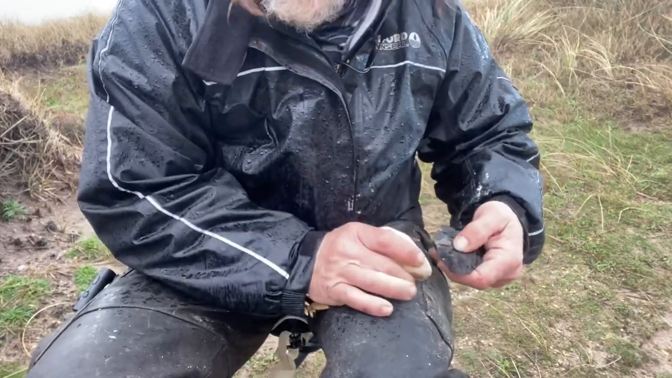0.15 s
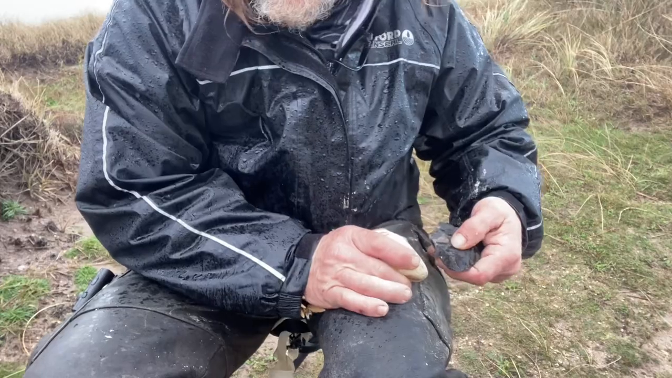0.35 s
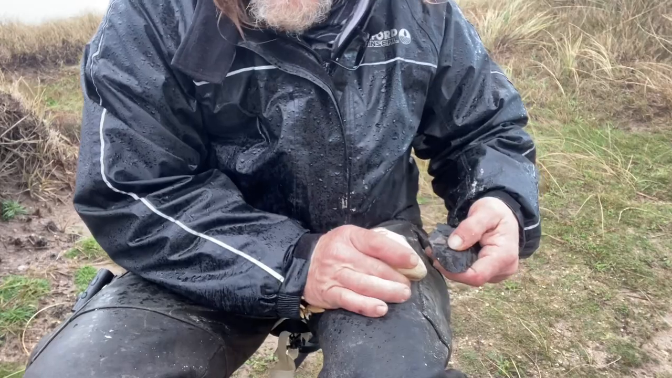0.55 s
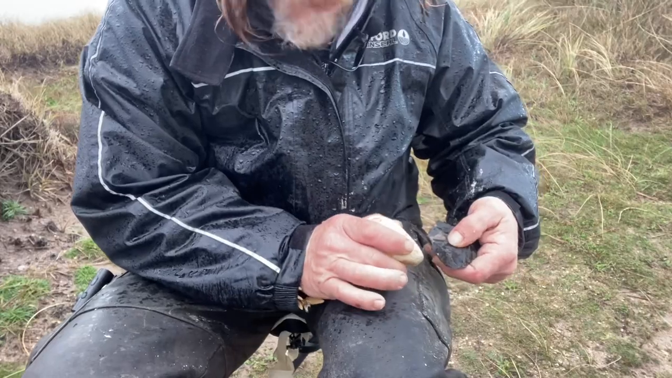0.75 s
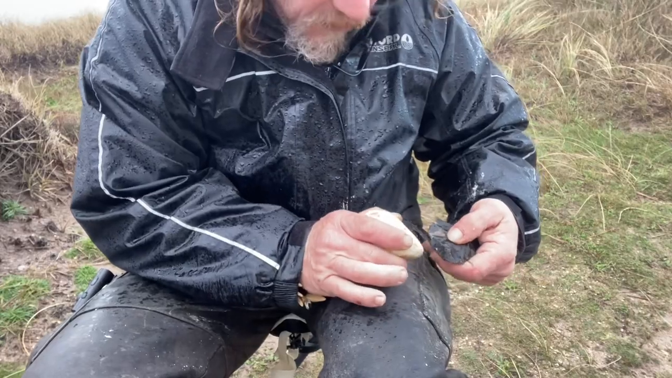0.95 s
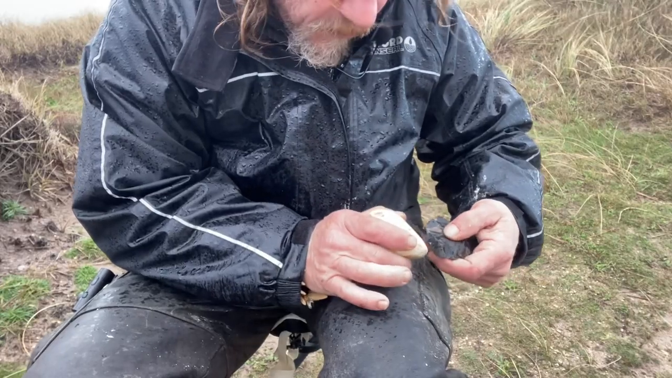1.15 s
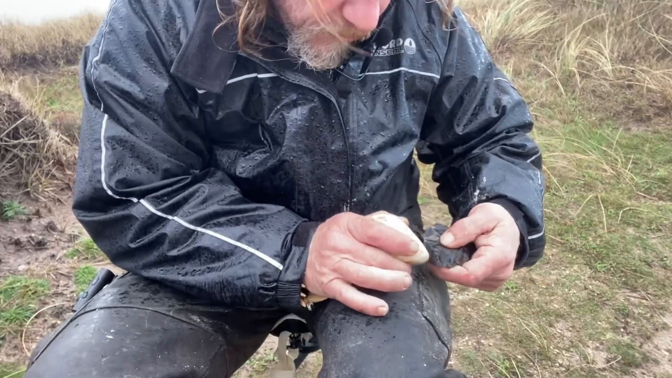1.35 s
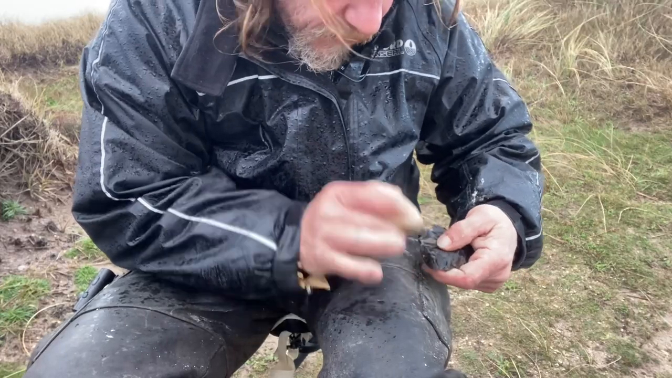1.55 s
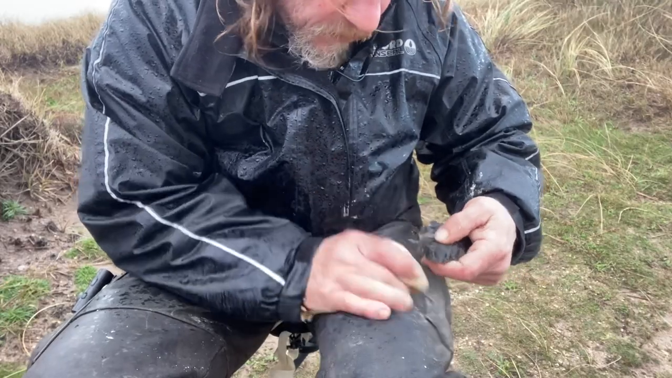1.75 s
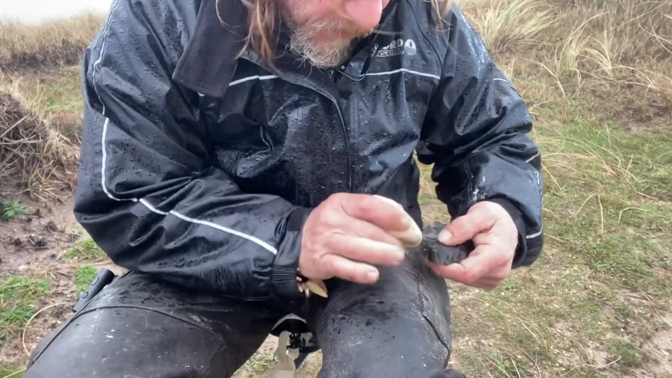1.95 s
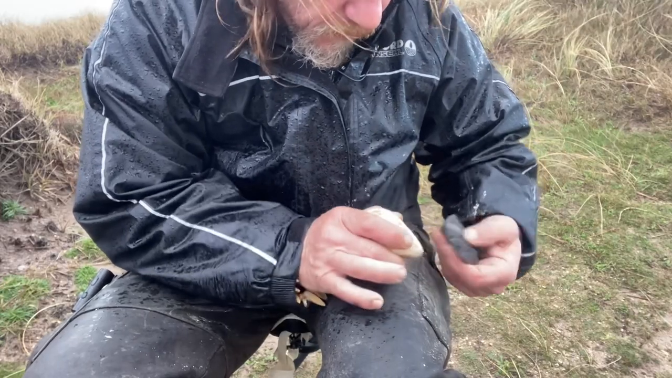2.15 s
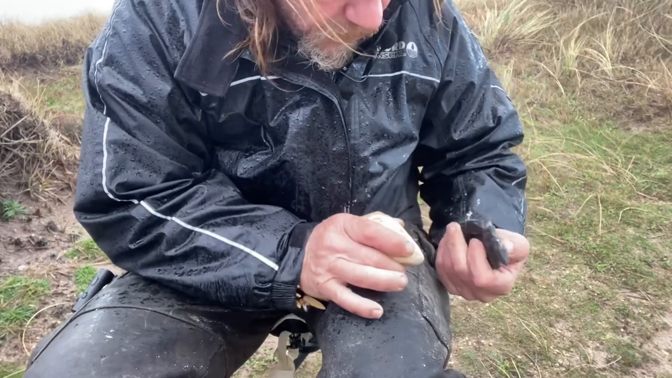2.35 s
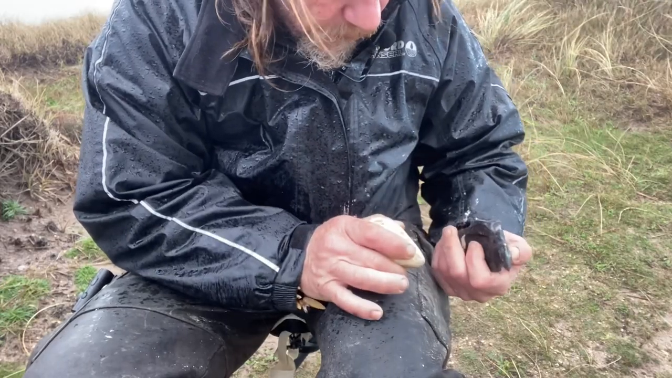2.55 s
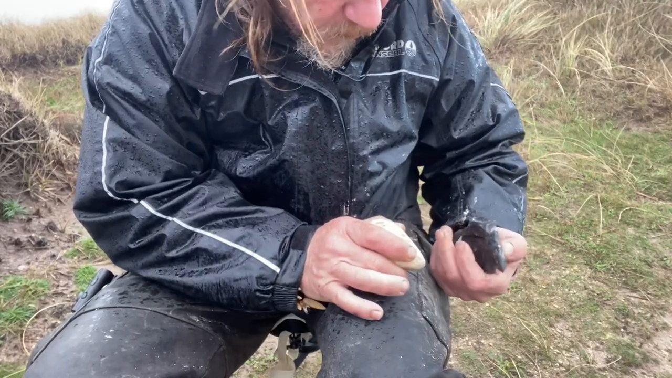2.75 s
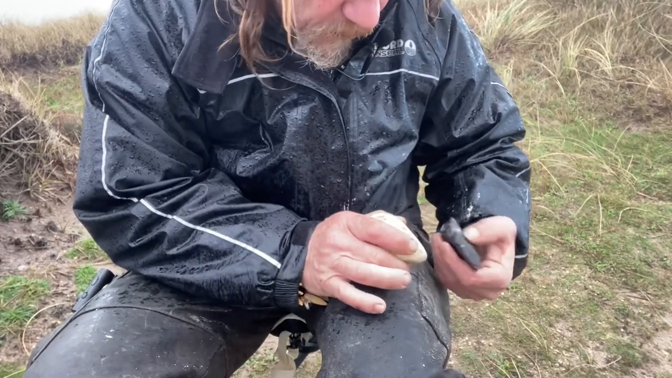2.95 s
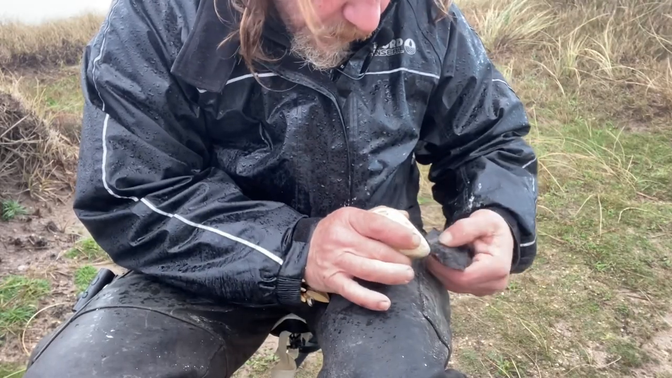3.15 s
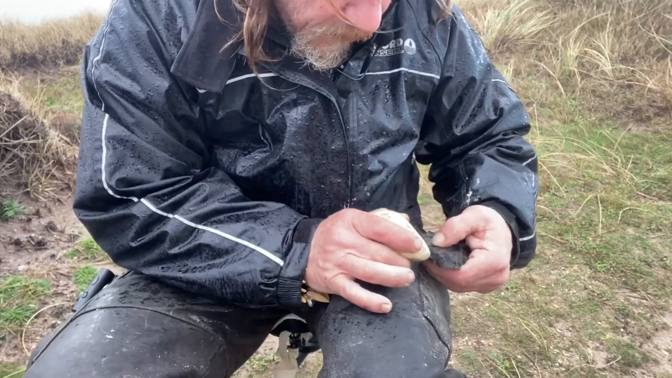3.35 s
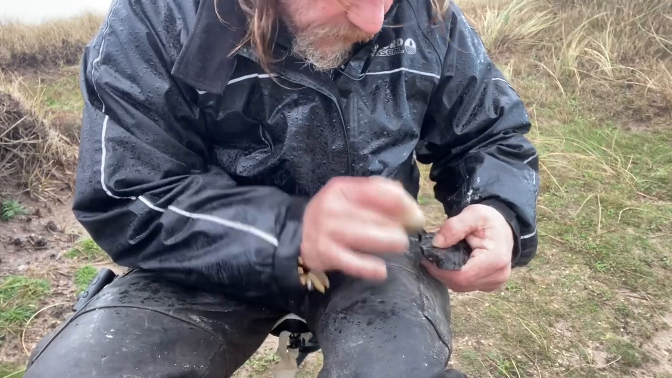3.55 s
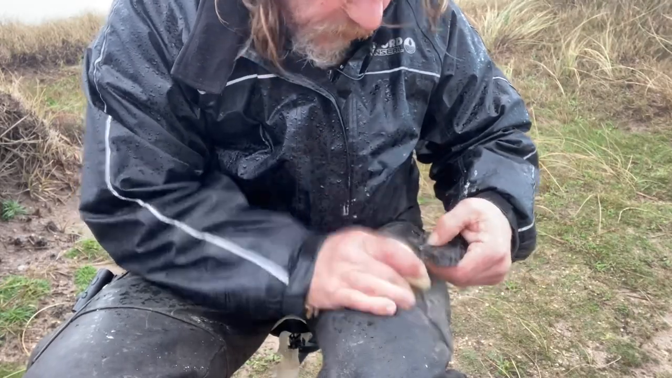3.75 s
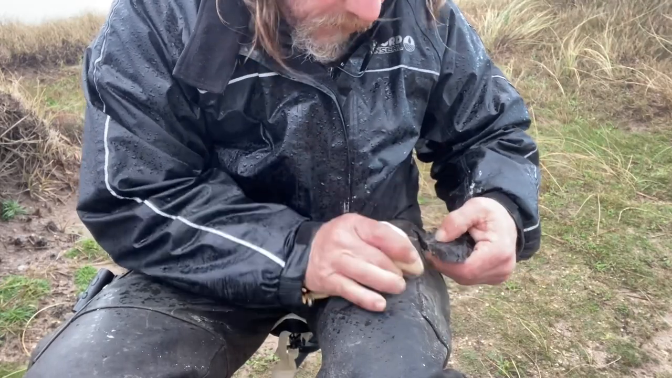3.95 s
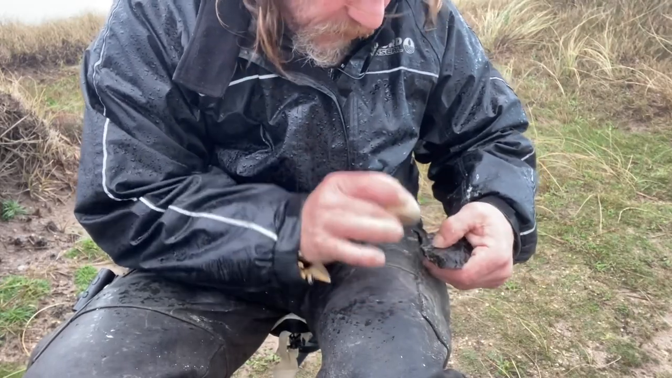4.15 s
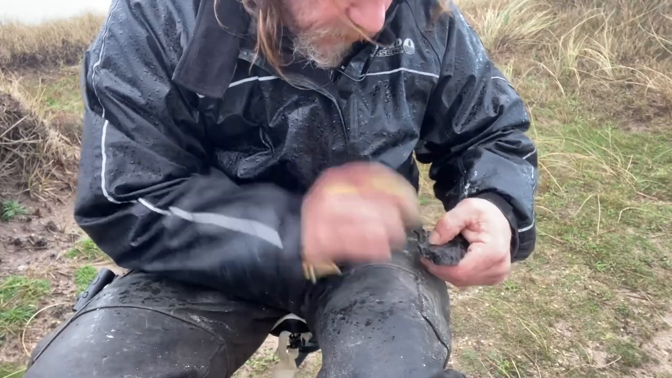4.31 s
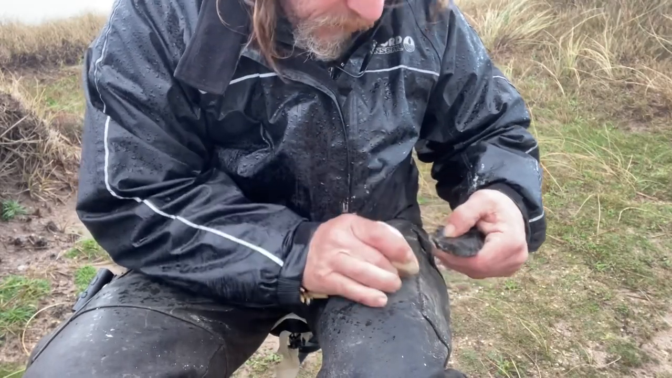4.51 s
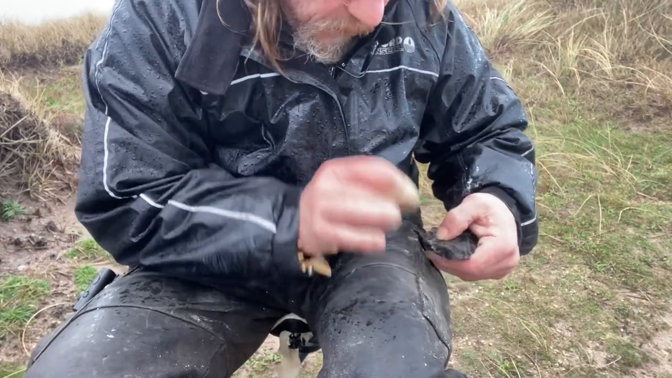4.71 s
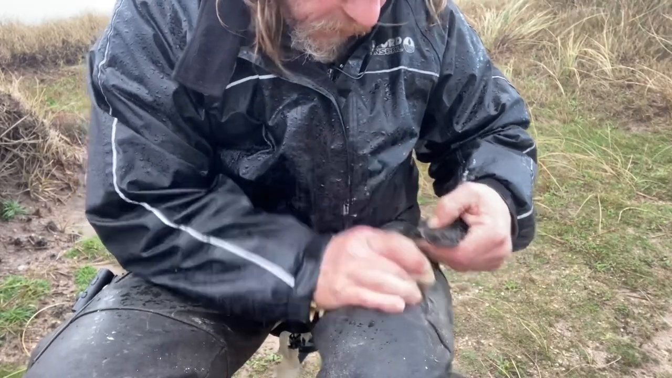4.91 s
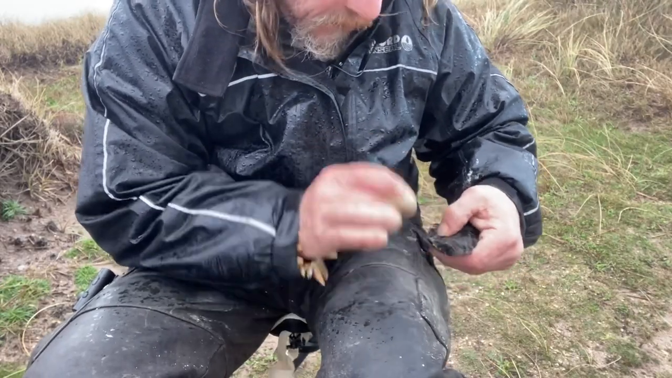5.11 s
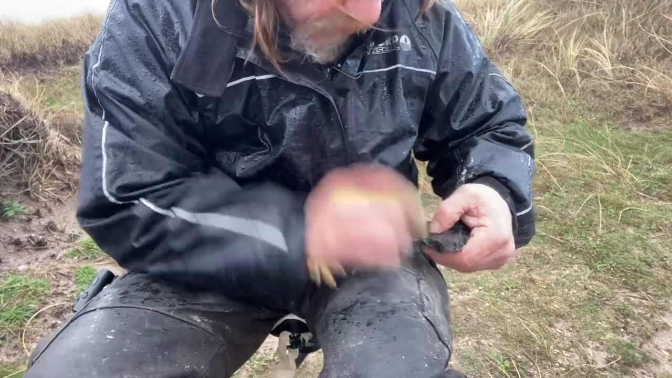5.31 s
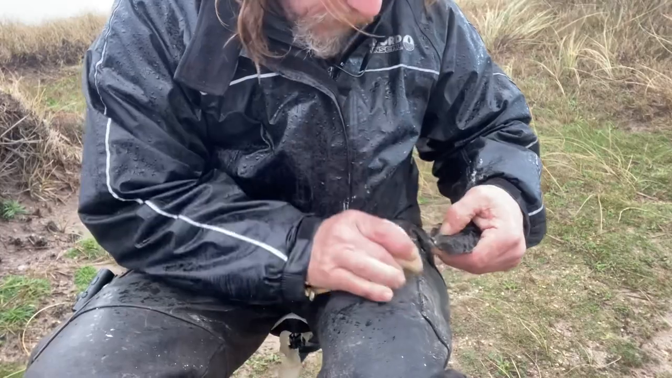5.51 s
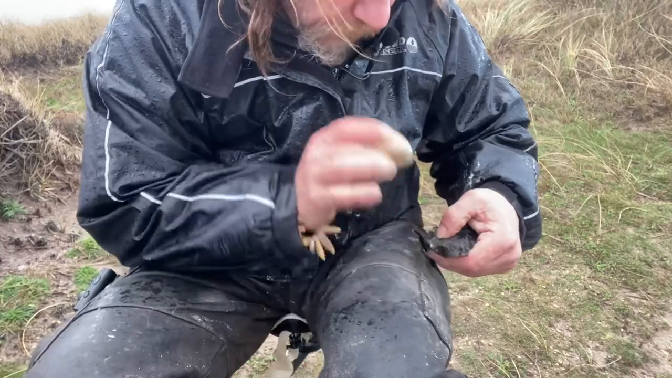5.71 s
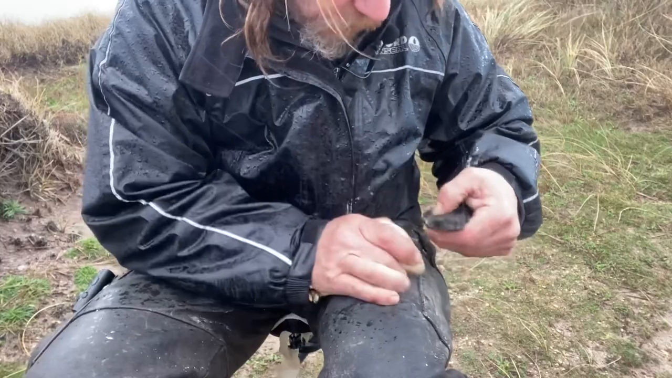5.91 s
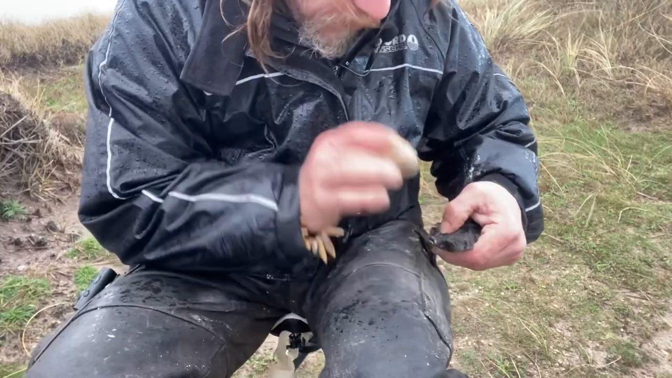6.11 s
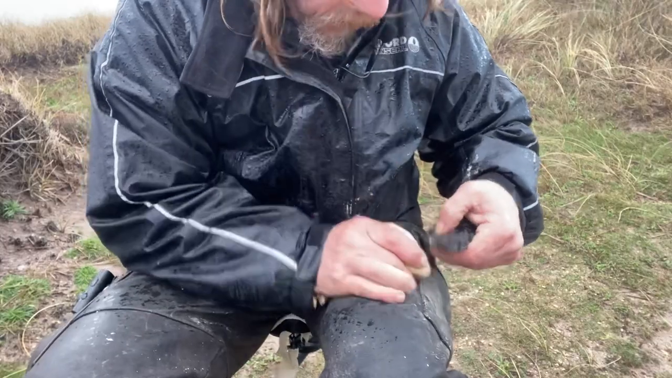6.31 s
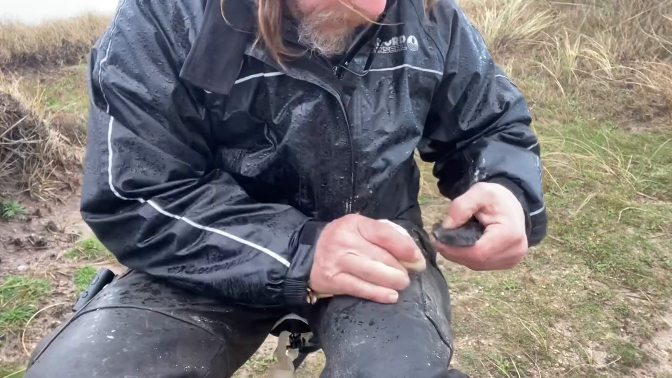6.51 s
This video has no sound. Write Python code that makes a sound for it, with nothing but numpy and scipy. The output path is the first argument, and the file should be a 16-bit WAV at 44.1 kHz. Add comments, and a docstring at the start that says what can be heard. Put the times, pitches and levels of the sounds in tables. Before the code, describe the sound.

Open outdoor air, dry and without echo, heard by a phone about a metre away. A faint grassy hiss lies under low wind rumble, with a strong brief buffet near 1.4 s. A nylon sleeve rustles from 1.45 s, swishes quickly, and a hammerstone touches flint at 1.73 s: a thin, bright, glassy tick with a tiny scrape. Faint jacket stirring and dry ticks follow. From 3.3 s gusts flutter and thump the microphone. A hard, sharp clack lands at 3.75 s, then more at 4.35, 4.9, 5.34, 5.84 and 6.27 s, each preceded by a rising sleeve swish. Every blow is a choked double contact with brief flint ring, splintering crack and gritty grind; those at 4.9 and 5.84 s are duller and crunchier, the one at 6.27 s rings clearly. Wind slaps cluster between blows, and a heavy low buffet swells at the end, about 6.5 s.

```python
"""On a windy grass bank, a hammerstone knocks flakes off a hand-held flint a metre from a phone.
Each blow clacks as two choked tones, rings the flint's modes and cracks, thuds and grinds in shaped noise.
The nylon sleeve swishes as hiss that follows the arm, with faint dry ticks on the jacket.
Gusts rumble and flutter as flickering noise, eddies thump the microphone ports as falling tones,
and a far wash of grass and air hisses beneath."""
import sys
import numpy as np
from scipy import signal
from scipy.fft import rfft, irfft
from scipy.io import wavfile
from scipy.ndimage import uniform_filter1d

SR = 44100
rng = np.random.default_rng(int(sys.argv[2]) if len(sys.argv) > 2 else 0)


def digitize_waveform(pressure):
    """Quantize a signal to 16-bit integers and store it at the path in sys.argv[1].

    Rows of a 2-D input are taken as channels; values are limited to [-1, 1].
    """
    field = np.atleast_2d(pressure).T
    bounded = np.clip(field, -1, 1)
    quanta = np.round(bounded * 32767).astype(np.int16)
    wavfile.write(sys.argv[1], SR, quanta)


N = 289737

# wind on the ports beneath the buffets: start_s, rumble_db, flutter_db
GUSTS = [(0.0, -38, -57), (0.12, -45, -55), (0.26, -41.5, -45.5), (1.13, -43.5, -45), (1.4, -38.5, -51.5),
         (1.82, -44, -47.5), (2.27, -43, -40), (2.55, -42.5, -42), (3.31, -37.5, -43), (3.61, -28, -39),
         (3.81, -42, -39.5), (4.04, -37, -37.5), (4.36, -37, -45.5), (4.52, -36.5, -43), (4.71, -34, -40),
         (4.94, -41.5, -39), (5.3, -43, -41), (5.61, -40, -36.5), (5.99, -31, -36), (6.29, -33.5, -36.5),
         (6.36, -39, -36.5)]
# short buffets of stronger wind: peak_s, rumble_db, flutter_db, half_length_s
WIND_BUFFETS = [(0.041, -28, -36.5, 0.057), (0.145, -25, -40, 0.014), (0.261, -33.5, -63, 0.056),
                (0.685, -36, -48, 0.051), (1.243, -29.5, -42.5, 0.024), (1.311, -26, -40, 0.015),
                (1.406, -19.5, -42.5, 0.014), (2.3, -34.5, -42, 0.055), (2.944, -38, -55, 0.015),
                (3.112, -33, -41, 0.049), (3.285, -32, -31, 0.0096), (3.318, -29, -46, 0.028),
                (3.478, -27, -40, 0.023), (3.55, -33, -32.5, 0.036), (3.652, -23.5, -33, 0.023),
                (3.744, -27, -32.5, 0.032), (3.896, -34, -49, 0.014), (3.975, -29.5, -30.5, 0.019),
                (4.343, -31.5, -38.5, 0.032), (4.534, -24.5, -32, 0.044), (4.702, -27.5, -34, 0.039),
                (4.774, -30, -43.5, 0.024), (4.87, -29.5, -39.5, 0.035), (5.206, -28.5, -35.5, 0.077),
                (5.342, -23.5, -28, 0.015), (5.876, -27, -29.5, 0.045), (5.983, -27.5, -24.5, 0.016),
                (6.075, -31, -33, 0.022), (6.328, -26, -35, 0.028), (6.422, -20.5, -35, 0.037),
                (6.48, -24, -30, 0.019), (6.519, -20, -23.5, 0.014), (6.565, -12, -26, 0.011)]
# colour of the low wind: pitch_hz, relative level_db per Hz
RUMBLE_COLOUR = [(24, -42), (38, -9), (60, -2), (90, -5), (140, -10.5), (220, -18.5), (400, -29.5)]
# colour of the quicker turbulence: pitch_hz, relative level_db per Hz
FLUTTER_COLOUR = [(90, -43), (160, 2), (260, -2), (450, -10), (700, -12), (1000, -18.5), (1600, -29.5)]
# colour of the far wash: pitch_hz, relative level_db per Hz
AIR_COLOUR = [(200, -8.5), (500, -3.5), (800, 2.5), (1200, -10), (2000, -9), (3000, -17.5), (5000, -19),
              (7000, -37), (10000, -119), (16500, -74.5)]
# eddies that slap the ports: start_s, level_db midway between channels, left_minus_right_db,
# last_pitch_hz, snap_db relative to the slap, t60_s
PORT_SLAPS = [(0.113, -33, -6.5, 105, -17, 0.055), (0.521, -34.5, -2, 202, -15, 0.068),
              (1.395, -22.5, -7.5, 93, -21, 0.1), (2.269, -35.5, -4.5, 191, -22, 0.07),
              (2.316, -36, -2.0, 199, -22, 0.055), (3.268, -24, -3, 196, -20, 0.053),
              (3.284, -27, -1, 94.2, -29, 0.082), (3.381, -27, 0.0, 116, -5, 0.044),
              (3.414, -34, 0, 150, -13, 0.034), (3.457, -28.5, 0, 116, -18, 0.073),
              (3.529, -27, 1, 138, -18, 0.059), (3.545, -29, 2, 200, -14, 0.04),
              (3.56, -30, 0, 200, -14, 0.04), (3.573, -19, 0.5, 91.5, -9, 0.063),
              (3.598, -28, 2, 120, -8, 0.04), (3.635, -29, -1, 91.5, -14, 0.089),
              (3.661, -27, 5, 250, -10, 0.036), (3.874, -24, -1.0, 91.5, -14, 0.055),
              (3.942, -28.5, -3, 262, -12, 0.071), (3.977, -28.5, -2, 91.5, -13, 0.055),
              (4.073, -29, 2, 91.5, -13, 0.048), (4.476, -33.5, -4.5, 299, -20, 0.05),
              (4.502, -32, 2, 294, -17, 0.047), (4.524, -21, -4, 91.5, -28, 0.072),
              (4.55, -23.5, 0, 91.5, -24, 0.087), (4.605, -30.5, -0.5, 96.9, -15, 0.055),
              (4.629, -37, -5, 91.5, -7, 0.044), (4.665, -27.5, 0, 264, -14, 0.055),
              (4.685, -22.5, 4, 95, -13, 0.042), (4.71, -20.5, -1, 144, -14, 0.04),
              (4.729, -34, 8, 202, -14, 0.031), (4.751, -32, -1, 242, -17, 0.042),
              (4.767, -34, 0, 178, -17, 0.055), (5.098, -20, -1, 224, -1.5, 0.034),
              (5.111, -22, -1.0, 150, -9, 0.053), (5.14, -24.5, 2, 210, -13, 0.06),
              (5.974, -23, 1, 137, 0, 0.039), (5.992, -20.5, 1, 91.5, -4, 0.051),
              (6.038, -17.5, 0, 91.5, -5, 0.049), (6.094, -24, 2, 127, -9, 0.044),
              (6.234, -27, 4, 90, -9, 0.046), (6.376, -24.5, -7.5, 175, -31, 0.1),
              (6.409, -32, 3, 89, -18, 0.069), (6.459, -25, 0, 148, -8, 0.063),
              (6.486, -29, -6, 99.6, -11, 0.037), (6.502, -20.5, -3, 91.5, -6, 0.055),
              (6.516, -17.5, -7.5, 107, -31, 0.065)]
# colour of the coated sleeve: pitch_hz, relative level_db per Hz
NYLON_COLOUR = [(900, 0), (1800, -0.5), (3500, -2.5), (6000, -4.5), (9000, -8.5), (13000, -11.5),
                (16500, -16)]
# faint stirring of the jacket in the wind and with small shifts: start_s, level_db
JACKET_STIR = [(0.0, -55.5), (0.4, -66.5), (0.93, -57.5), (1.42, -65.5), (1.8, -56.5), (1.87, -50),
               (1.94, -62.5), (2.42, -59), (2.57, -67.5), (3.06, -60.5), (3.24, -71), (3.44, -64.5),
               (3.89, -54.5), (3.93, -47), (3.99, -65), (4.49, -57.5), (4.52, -50.5), (4.59, -56),
               (5.5, -52), (5.97, -53.5), (6.43, -54.5), (6.57, -54)]
# strokes of the hammer arm: blow_s, lift_begins_s, arm_turns_s, lateness of the fastest lift (1 = middle),
# lift_db, lift_folds_db relative to the lift, swing_db, follow_db, follow_ends_s
ARM_STROKES = [(1.732, 1.45, 1.665, 1.15, -46.5, -3, -39, -51.5, 1.8),
               (3.745, 3.474, 3.677, 1.2, -45, -6, -32.5, -45, 3.85),
               (4.348, 3.95, 4.28, 1.6, -46, 6, -33, -49, 4.5),
               (4.907, 4.59, 4.83, 1.64, -44, 0.5, -31.5, -43.5, 5.33),
               (5.34, 5.06, 5.265, 1.2, -46, 1, -34, -42, 5.455),
               (5.84, 5.53, 5.77, 1.35, -43, -1, -33, -40, 5.905),
               (6.275, 5.97, 6.2, 0.98, -42.5, 3, -32, -41.5, 6.39)]
# dry ticks on the jacket: start_s, level_db
JACKET_TICKS = [(1.3164, -52), (1.3967, -43.5), (1.8701, -37), (3.9215, -48.5), (4.5151, -47),
                (4.6354, -45), (5.9978, -47)]
# contacts of stone on flint: start_s, clack_db, clack_pitch_hz, second_clack_db, knock_db, ring_db,
# upper_modes_db, ping_db, crack_db, crack_pitch_hz, thud_db, grit_db, grit_t60_s
STONE_CONTACTS = [(1.7312, -31, 1566, -36.5, -36, -22, -16, -11.5, -3, 12630, -37, -34.5, 0.04),
                  (1.741, -30, 1072, -27.5, -49, -40, -43.5, -43, -51, 8960, -32, -38.5, 0.151),
                  (3.7456, -10.5, 1470, -18, -10.5, -9.5, -7, -10, -8, 8360, -33, -21.5, 0.062),
                  (3.756, -27, 1070, -21, -20.5, -25, -28, -31, -32, 10600, -23, -30.5, 0.074),
                  (4.349, -13.5, 1577, -25, -11.5, -5, -6, -10, -6, 8460, -35, -17.5, 0.04),
                  (4.357, -28, 1036, -23, -38, -22, -26, -30, -28, 8000, -26.5, -39, 0.081),
                  (4.9056, -13.5, 1214, -18, -16, -33, -23.5, -34, -13, 7700, -17.5, -20, 0.015),
                  (4.9084, -14.5, 1127, -26, -26, -33, -30, -40, -14.5, 7550, -31, -25, 0.05),
                  (5.34, -6, 1504, -7, -9.5, -11, -11, -19, -10, 11500, -50, -32, 0.088),
                  (5.351, -22, 900, -27, -22, -24, -25, -34, -23, 9400, -20, -25, 0.075),
                  (5.838, -30, 970, -25, -23, -14, -11, -42, -18, 8250, -24, -23, 0.049),
                  (5.845, -19, 960, -18, -14, -18, -22, -22, -14, 7000, -13, -22, 0.09),
                  (6.2749, -9, 1503, -9, -13, -3.5, -5.5, -45, -24, 8000, -14.5, -25.5, 0.092),
                  (6.2837, -15, 1045, -22, -18, -27, -29, -40, -29, 8400, -22, -22.5, 0.045)]
# modes of the held flint: pitch_hz, level_db, t60_s
# the first two knock, the third rings, the last is the thin edge that pings
FLINT_MODES = [(2330, 2.5, 0.0063), (2530, 0.5, 0.015), (3522, -9.5, 0.018), (4350, -5.5, 0.0052),
               (4740, -17, 0.0085), (5160, -14, 0.014), (6760, -33.5, .01), (7400, -28, 0.011),
               (7840, -28, 0.008), (9430, -18.5, 0.0065), (12800, -25, 0.011), (10640, 7, 0.018)]
# microphone pair: pitch_hz, likeness (0-1), right_lead_rad for wide sounds,
# right_lead_rad for the stones, right_gain_db
MIC_PAIR = [(20, .6, 0, 0, 0), (70, .4, 0, 0, 1), (200, .2, -1.2, -1.2, 2), (450, .5, -2.3, -2.2, 2.5),
            (800, .8, -2.9, -1, 3), (1200, .85, -2.4, .9, 2), (1700, .85, -1, 1.2, 1.5),
            (2100, .8, 0, 2.2, 1), (2800, .65, 1.2, 3.1, 1.5), (3500, .5, 1.8, 1, 2),
            (5500, .35, 2.3, 2.6, 2), (7000, .9, .4, .4, 0), (8400, .99, 0, 0, 0),
            (10100, .995, -2.9, -2.9, 0), (11100, .995, -3.4, -3.4, 0), (12800, .99, -6.28, -6.28, 0),
            (15200, .99, -9.42, -9.42, 0), (16500, .99, -10.5, -10.5, 0)]

TOP_HZ = 15850
BINS_HZ = np.maximum(np.arange(N // 2 + 1) * SR / N, 1)
AIR_DB = -48
# small slaps inside the flutter
EDDIES_PER_S, EDDY_DB, EDDY_SPREAD_DB, EDDY_T60_S = 90, -5, 3, 0.038
SLAP_FIRST_HZ, SLAP_GLIDE_S = 803.6, 0.00433
# phase between the channels; a slap further right than FAR_PORT_DB comes from the other port and turns back
SLAP_TURN_RAD, FAR_PORT_DB = 2.0, -5
# level follows arm speed: an arch in the lift, a steady gain in the swing
LIFT_ARCH, SWING_POWER, SWING_STOP_DB_S = 0.45, 0.99, 901.5
LIFT_BRIGHTENS = 0.42  # the treble grows by this further power of the lift's arch
# the blow halts the arm for a moment
FOLLOW_WAIT_S, FOLLOW_SAG_DB_S, FOLLOW_FALL_DB_S = 0.03, 59, 259
SWING_FOLDS_DB, FOLLOW_FOLDS_DB, STIR_FOLDS_DB = -1.5, 1.5, 5
# the clack builds through the contact and rings until the fingers choke it
CLACK_RISE_S, CLACK_HOLD_S = .0012, 0.0072
CLACK_T60_S, CRACK_T60_S, THUD_T60_S = 0.037, 0.0037, 0.041
REBOUND_S, REBOUND_DB = .0014, -4
CHATTER_DB, CHATTER_T60_S = -8, .011  # how hard and how long the flake tears
GRIP_DB, GRIP_DETUNE = 2, .012  # how far each grip shifts the modes in level and, as a fraction, in pitch
SPLINTER_DB, CONTACT_DB = -5, -3  # relative to the band at the crack's pitch; relative to the knock
GRIND_S = .024  # the grinding stops as the stone slips off


def undb(db):
    """Gain of a level in dB."""
    return 10 ** (np.asarray(db) / 20)


def unit(x):
    """Scaled to rms 1."""
    return x / np.sqrt(np.mean(x ** 2))


def curves(table):
    """The columns of a timed table, drawn as one value per sample."""
    s, *columns = np.transpose(table)
    return [np.interp(np.arange(N) / SR, s, c) for c in columns]


def walk(rate):
    """Random levels held 1 / rate s and slewed twice, rms 1."""
    hold = int(SR / rate)
    steps = np.repeat(rng.standard_normal(N // hold + 1), hold)
    return unit(uniform_filter1d(uniform_filter1d(steps, hold), hold)[:N])


def hiss(colour, flicker_db, shared_db, rate, patchy_db=0, patchy_rate=10.):
    """Two unrelated noises in half-octave bands that flicker together and alone, and swell at a second rate."""
    hz, db = np.transpose(colour)
    shape_db = np.interp(np.log(BINS_HZ), np.log(hz), db, left=-200, right=-200)
    spectrum = rfft(rng.standard_normal((2, N))) * undb(shape_db)
    shared, out = shared_db * walk(rate), 0
    for step in range(int(2 * np.log2(hz[0])), int(2 * np.log2(hz[-1])) + 2):
        weight = np.clip(1 - np.abs(2 * np.log2(BINS_HZ) - step), 0, 1)
        level_db = shared + flicker_db * walk(rate) + patchy_db * walk(patchy_rate)
        out = out + undb(level_db) * irfft(spectrum * weight, N)
    return unit(out)


def band(x, lo_hz, hi_hz):
    """Band-pass, rms 1."""
    return unit(signal.sosfilt(signal.butter(2, [lo_hz, hi_hz], "band", fs=SR, output="sos"), x))


def fade(t, t60):
    """Falls 60 dB in t60 s, or in 2 ms if t60 is shorter."""
    return np.exp(-np.log(1000) * t / max(t60, .002))


def ramp_db(start, end, rise_db_s, fall_db_s):
    """0 dB from start to end s; climbs to it before and drops after."""
    t = np.arange(N) / SR
    return -rise_db_s * np.maximum(start - t, 0) - fall_db_s * np.maximum(t - end, 0)


def add(out, s, sound):
    """Mixes a sound in from time s."""
    i = int(s * SR)
    out[:, i:i + sound.shape[1]] += sound[:, :N - i]


def slowing(t, last_hz):
    """Cycles of an eddy's pressure swing, which slows as it rolls off the port."""
    return last_hz * t + (SLAP_FIRST_HZ - last_hz) * SLAP_GLIDE_S * (1 - np.exp(-t / SLAP_GLIDE_S))


def far_wash():
    """Far grass and air blend into a hiss that swells faintly."""
    return undb(AIR_DB) * hiss(AIR_COLOUR, flicker_db=.5, shared_db=.3, rate=4., patchy_db=1.1, patchy_rate=12.)


def wind():
    """Turbulence rumbles and flutters on the ports, swelling in buffets."""
    power, now = undb(curves(GUSTS)) ** 2, np.arange(N) / SR
    for s, rumble_db, flutter_db, half in WIND_BUFFETS:
        power = power + undb([[rumble_db], [flutter_db]]) ** 2 * np.exp(-((now - s) / half) ** 2)
    rumble = hiss(RUMBLE_COLOUR, flicker_db=1.5, shared_db=2.0, rate=14.)
    flutter = hiss(FLUTTER_COLOUR, flicker_db=1.5, shared_db=3.5, rate=60.0)
    flutter = unit(flutter + undb(EDDY_DB) * small_eddies())
    return np.sqrt(power[0]) * rumble + np.sqrt(power[1]) * flutter


def small_eddies():
    """Eddies strike at random with uneven strength, each a short falling tone; rms 1."""
    chance, t = rng.random((2, 2, N)), np.arange(SR // 20) / SR
    kicks = (chance[0] < EDDIES_PER_S / SR) * undb(-EDDY_SPREAD_DB * np.log(1 - chance[1]))
    eddy = np.sin(2 * np.pi * slowing(t, 139.0)) * fade(t, EDDY_T60_S) * np.minimum(t / 0.0023, 1)
    return unit(signal.fftconvolve(kicks, eddy[None], axes=1)[:, :N])


def sleeve():
    """Coated nylon hisses as the arm lifts, swings and follows through; folds fill in its lower part."""
    cloth = hiss(NYLON_COLOUR, flicker_db=1.0, shared_db=0.74, rate=86.0, patchy_db=2.0, patchy_rate=20.)
    cloth = unit(cloth * undb(1.2 * walk(450.)))  # fine creases crackle
    folds = signal.sosfilt(signal.butter(2, 3500, fs=SR, output="sos"), cloth)
    t = np.arange(N) / SR
    moves = [(undb(curves(JACKET_STIR)[0]), STIR_FOLDS_DB, 1)]  # gain, folds dB, treble gain
    for s, begin, turn, late, lift_db, folds_db, swing_db, follow_db, end in ARM_STROKES:
        progress = np.clip((t - begin) / (turn - begin), 0, 1)
        lift = np.abs(np.sin(np.pi * progress ** late)) ** LIFT_ARCH
        swing = np.clip((t - turn) / (s - turn), 0, 1) ** SWING_POWER
        swing = swing * undb(ramp_db(0, s, 0, SWING_STOP_DB_S))
        restart = s + FOLLOW_WAIT_S
        sag_db = ramp_db(restart, restart, SWING_STOP_DB_S, FOLLOW_SAG_DB_S)
        follow = undb(sag_db + ramp_db(0, end, 0, FOLLOW_FALL_DB_S))
        moves += [(undb(lift_db) * lift, folds_db, lift ** LIFT_BRIGHTENS),
                  (undb(swing_db) * swing, SWING_FOLDS_DB, 1),
                  (undb(follow_db) * follow, FOLLOW_FOLDS_DB, 1)]
    high = np.sqrt(sum((gain * bright) ** 2 for gain, _, bright in moves))
    low = np.sqrt(sum((gain * undb(folds_db)) ** 2 for gain, folds_db, _ in moves))
    return high * (cloth - folds) + low * folds


def slaps():
    """Single eddies slap the ports as short falling thumps; both channels carry each, turned in phase."""
    out, t = np.zeros((2, N)), np.arange(SR // 10) / SR
    sides = np.array([[.5], [-.5]])  # left, right
    for s, level_db, pan_db, last_hz, snap_db, t60 in PORT_SLAPS:
        noise = rng.standard_normal((2, len(t)))
        # the swing is roughened by random phase and by noise about its last pitch
        swing = np.sin(2 * np.pi * slowing(t, last_hz) + 0.65 * noise[0, 0])
        puff = (swing + 0.51 * band(noise[0], last_hz, 2.35 * last_hz)) * fade(t, t60)
        snap = band(noise[1], 470.0, 1170.0) * fade(t, 0.025)
        slap = (puff + undb(snap_db) * snap) * np.minimum(t / 0.003, 1)
        slap = signal.sosfilt(signal.butter(4, 1150., fs=SR, output="sos"), slap)  # the ports pass no treble of it
        turn = SLAP_TURN_RAD * np.sign(pan_db - FAR_PORT_DB) * sides
        turned = np.real(signal.hilbert(slap) * np.exp(1j * turn)) / np.cos(SLAP_TURN_RAD / 2)
        add(out, s, undb(level_db + pan_db * sides) * turned)
    return out


def ticks():
    """Dry ticks on the jacket: bright noise that dies within milliseconds."""
    out, t = np.zeros((2, N)), np.arange(SR // 50) / SR
    for s, level_db in JACKET_TICKS:
        noise = rng.standard_normal((2, len(t)))
        add(out, s, undb(level_db) * band(noise, 3000., 15000.) * fade(t, 0.0044))
    return out


def stone_clack(t, turn, clack_hz, clack_db, second_db):
    """Hammerstone and flint clack as a close pair of tones, both choked by the fingers."""
    pair_hz = clack_hz * np.array([[1], [1.29]])
    tones = np.sin(2 * np.pi * (pair_hz * t + 0.89 * turn))
    clack = np.sum(undb([[clack_db], [second_db]]) * tones, axis=1)
    return clack * fade(t, CLACK_T60_S) * (1 - np.exp(-t / CLACK_RISE_S)) * np.exp(-(t / CLACK_HOLD_S) ** 4)


def flint_modes(t, turn, knock_db, ring_db, upper_db, ping_db):
    """The struck flint's decaying modes, split into the ring of its body and the ping of its thin edge."""
    hz, db, t60 = (c[:, None] for c in np.transpose(FLINT_MODES))
    struck_db = db + np.array([knock_db] * 2 + [ring_db] + [upper_db] * (len(hz) - 4) + [ping_db])[:, None]
    grip = rng.standard_normal((2, len(hz), 1))  # each grip and struck spot favours other modes
    held_hz = hz * (1 + GRIP_DETUNE * grip[1] * (hz < 10000))
    tones = np.sin(2 * np.pi * (held_hz * t + turn))
    modes = undb(struck_db + GRIP_DB * grip[0]) * np.exp(-np.log(1000) * t / t60) * tones
    ring = np.sum(modes[:, :-1], axis=1) * np.minimum(t / 0.00043, 1)
    return ring, modes[:, -1] * np.minimum(t / 0.00082, 1)


def hammer_force(t, noise):
    """The hammer lands, rebounds onto the edge once more and chatters as the flake tears."""
    chatter = noise[3, :, :400] * (noise[4, 0, :400] > 2.1)  # only sparse noise samples strike
    force = undb(CHATTER_DB) * chatter * fade(t[:400], CHATTER_T60_S)
    force[:, 0], force[:, int(REBOUND_S * SR)] = 1, undb(REBOUND_DB)
    return force


def splintering_crack(t, noise, crack_hz):
    """The flake cracks as a noise band about one pitch, and splinters fill the whole treble."""
    crack = band(band(noise[0], 0.91 * crack_hz, 1.07 * crack_hz), 0.8 * crack_hz, 1.12 * crack_hz)
    return (crack + undb(SPLINTER_DB) * band(noise[3], 2500.0, TOP_HZ)) * fade(t, CRACK_T60_S)


def grinding_grit(t, noise, t60):
    """Crumbs break unevenly under the stone until it slips off."""
    grains = undb(1.6 * unit(uniform_filter1d(uniform_filter1d(noise[4, 1], size=30), size=30)))
    grit = band(noise[1] * grains, 520.0, 10600.0) * fade(t, t60)
    return grit * np.exp(-(t / GRIND_S) ** 4) * np.minimum(t / 0.0008, 1)


def knapping():
    """Each contact: a clack of the held stones, the flint's modes, a crack, a thud and grinding grit."""
    out, t = np.zeros((2, N)), np.arange(SR // 8) / SR
    for (s, clack_db, clack_hz, second_db, knock_db, ring_db, upper_db, ping_db,
         crack_db, crack_hz, thud_db, grit_db, grit_t60) in STONE_CONTACTS:
        turn = rng.random((2, len(FLINT_MODES) + 2, 1))  # starting phases in cycles
        noise = rng.standard_normal((5, 2, len(t)))
        clack = stone_clack(t, turn[:, :2], clack_hz, clack_db, second_db)
        ring, ping = flint_modes(t, turn[:, 2:], knock_db, ring_db, upper_db, ping_db)
        ring = signal.fftconvolve(ring, hammer_force(t, noise), axes=1)[:, :len(t)]
        crack = undb(crack_db) * splintering_crack(t, noise, crack_hz)
        click = undb(knock_db + CONTACT_DB) * band(noise[1], 900., 4500.0) * fade(t, 0.0068)
        # the jolt in hand and knee
        thud = band(noise[2], 318.0, 860.0) * fade(t, THUD_T60_S) * np.minimum(t / 0.0055, 1)
        grit = undb(grit_db) * grinding_grit(t, noise, grit_t60)
        add(out, s, clack + ring + crack + click + ping + undb(thud_db) * thud + grit)
    return out


def ports(draws, column):
    """The right port hears a part of what the left hears, turned in phase, and a part of its own."""
    table, length = np.transpose(MIC_PAIR), N + SR // 10  # room for the turned tail
    bins_hz = np.fft.rfftfreq(length, 1 / SR)
    alike, lead, gain_db = (np.interp(bins_hz, table[0], table[k]) for k in (1, column, 4))
    left, other = rfft(draws, length)
    right = undb(gain_db) * np.exp(1j * lead) * (alike * left + np.sqrt(1 - alike ** 2) * other)
    return np.array([draws[0], irfft(right, length)[:N]])


def scene():
    """The microphone pair blends two draws of each source; the slaps reach both channels directly."""
    air = far_wash()
    stones = ports(knapping(), column=3)
    wide = ports(sleeve() + ticks() + wind() + air, column=2)
    return stones + wide + slaps()


def record(dry):
    """The phone rounds the loudest peaks and cuts the top."""
    rounded = np.tanh(0.76 * dry) / 0.85
    return signal.sosfilt(signal.ellip(10, .2, 80, TOP_HZ, fs=SR, output="sos"), rounded)


dry = scene()
out = record(dry)
digitize_waveform(out)
```